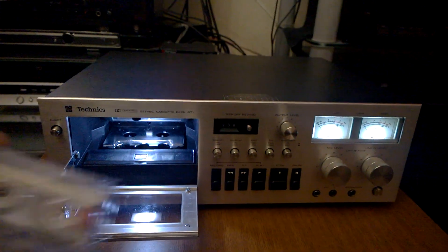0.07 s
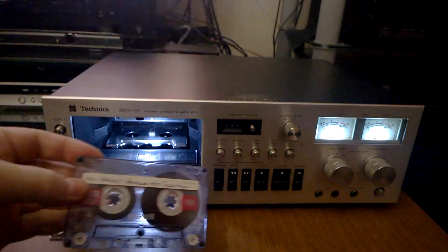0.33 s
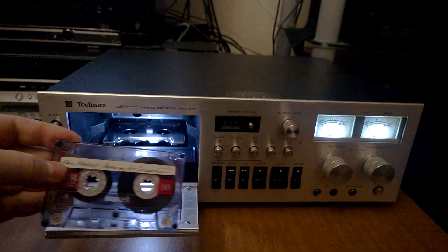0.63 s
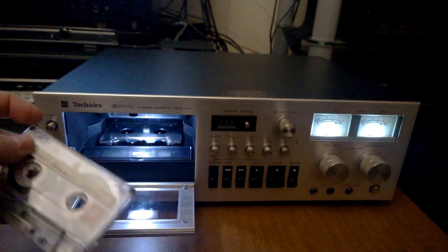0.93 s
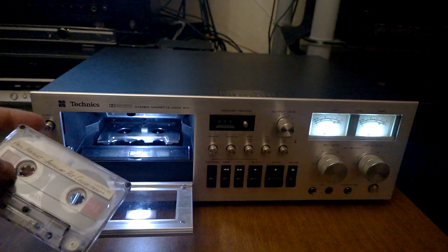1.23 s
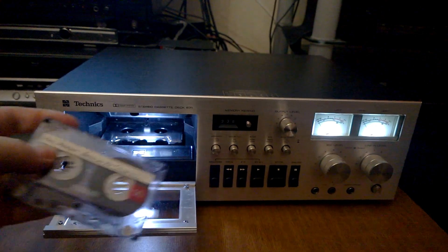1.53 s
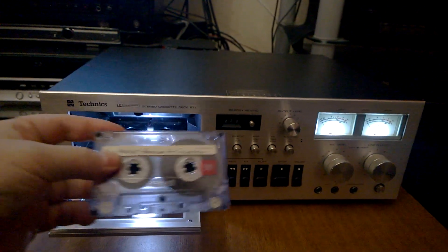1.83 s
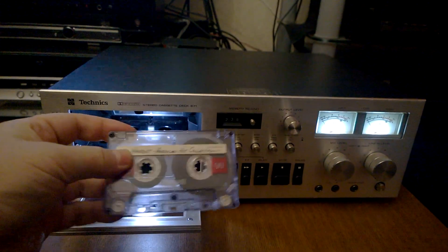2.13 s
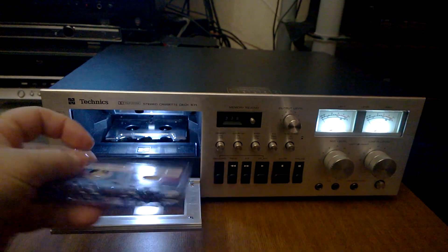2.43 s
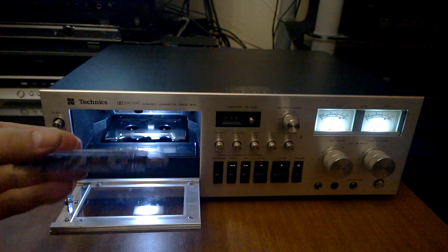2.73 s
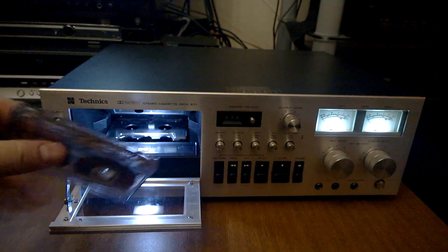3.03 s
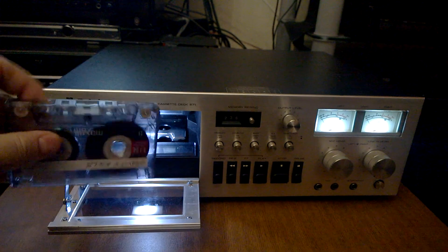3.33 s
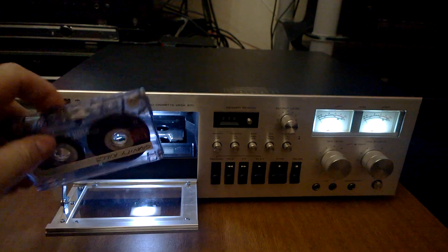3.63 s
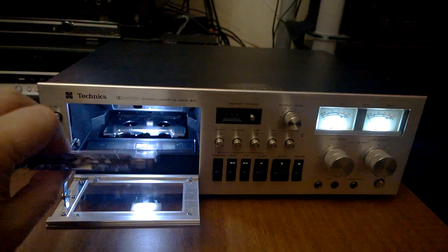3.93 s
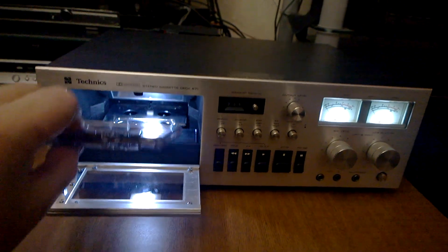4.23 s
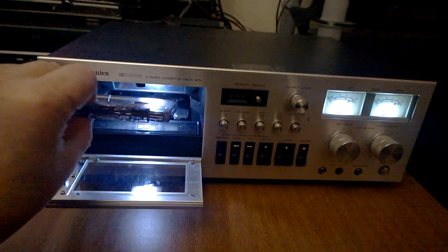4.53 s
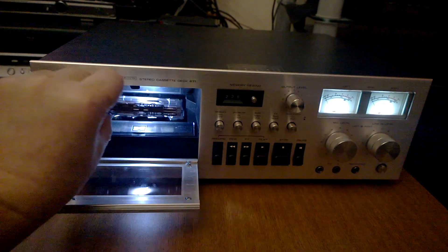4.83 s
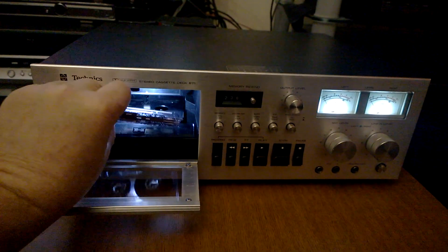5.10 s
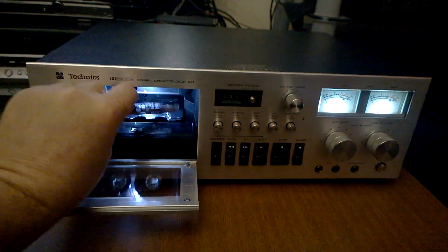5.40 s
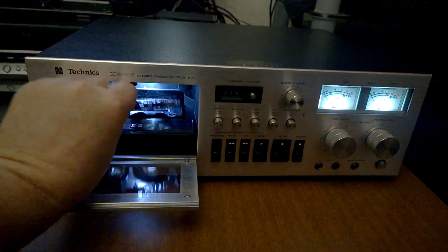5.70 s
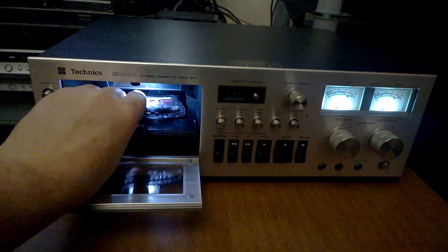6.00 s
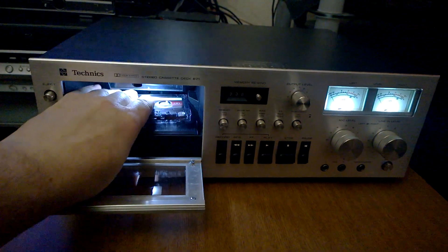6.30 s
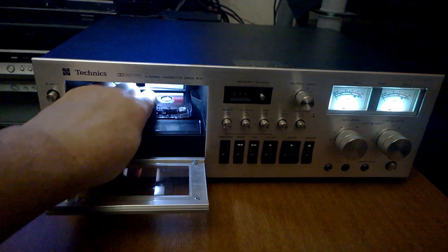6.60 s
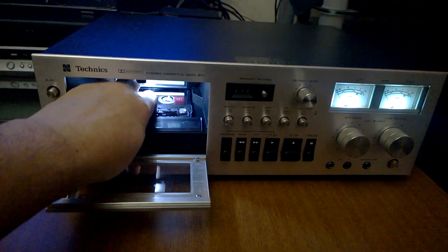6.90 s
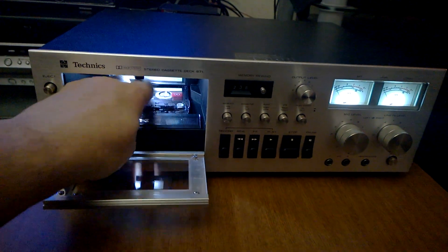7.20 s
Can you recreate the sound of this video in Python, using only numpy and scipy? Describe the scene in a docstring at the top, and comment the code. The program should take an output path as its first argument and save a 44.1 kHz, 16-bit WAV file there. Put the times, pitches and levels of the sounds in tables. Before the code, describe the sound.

A plastic cassette rattles lightly in the hand, then knocks and scrapes into a tape deck over faint hiss and hum.

```python
"""Loading a cassette into a tape deck

A plastic cassette is turned over in the hand, then pushed into a tape deck in a small, quiet room.
Its loose reels rattle and give thin squeaks. The shell scrapes along the guides, knocks on the
carriage (the holder it slides into), which rings, and plucks a spring as it snaps home.
Under it all lie a soft rumble, a faint mains hum and hiss."""
import sys
import numpy as np
from scipy import signal
from scipy.fft import rfft, irfft
from scipy.io import wavfile

SR = 44100
rng = np.random.default_rng(int(sys.argv[2]) if len(sys.argv) > 2 else 0)


def generate_wav(signal):
    """Clip the signal to [-1, 1] and save it as 16-bit WAV at the path in sys.argv[1]."""
    frames = np.transpose(np.atleast_2d(signal))
    scaled = np.clip(frames, -1, 1) * 32767
    pcm = np.round(scaled).astype(np.int16)
    wavfile.write(sys.argv[1], SR, pcm)


N = 324135
T = np.arange(N) / SR
AGE = T[:SR // 2]  # seconds since a blow; each blow gets half a second
# A "mode" is one tone an object rings at; "t60" is the time a sound takes to fade by 60 dB.
# Softness runs from 0 (bare plastic edge) to 1 (cushioned by a finger).

# the shell hitting the carriage: (time [s], level [dB], ring centre [Hz], softness [0-1],
# boom level [dB], second blow compared with the first [dB])
KNOCK_EVENTS = [(5.11, -52.5, 1000, .45, -73, -24), (5.126, -39.5, 900, 0.66, -66, -12.5),
                (5.304, -37.5, 1310, 0.34, -60, -11), (5.33, -44.5, 1080, 0.25, -47.5, -22),
                (5.608, -51.5, 1180, 0.76, -63.5, -6.5), (5.663, -42, 1030, 0.46, -66, -16),
                (5.726, -41, 864, .97, -74, -33), (5.755, -25.5, 780, 0.86, -52, -24),
                (5.82, -31.5, 1040, 0.9, -48, -9), (6.005, -53.5, 790, 0.76, -63.5, -3.5),
                (6.118, -31.5, 910, 0.23, -51.5, -4), (6.172, -25, 974, 0.07, -37, -18),
                (6.388, -47.5, 1040, 0.89, -72, -18.5), (6.456, -52.5, 890, 0.96, -74.5, -0.5),
                (6.542, -36, 1006, 0.6, -48.5, -5.5), (6.594, -49, 820, 0.65, -54.5, -25),
                (6.837, -59.5, 1145, .45, -69.5, -15), (6.979, -43, 1370, 0.67, -59, -5.5),
                (7.119, -47, 840, 0.16, -68, 1), (7.207, -47.5, 1120, 0.31, -60.5, -2),
                (7.252, -44.5, 940, .97, -59, -9), (7.338, -53.5, 965, 0.78, -57.5, -12)]
# the hand turning the cassette: (time [s], level [dB], half length [s])
HAND_TURNS = [(0.868, -64, .07), (2.368, -72.5, 0.16), (2.675, -60, 0.05), (2.996, -49, 0.036),
              (3.089, -45, 0.032), (3.181, -47.5, 0.022), (3.33, -56, 0.04)]
# tone colour of hard plastic contact: (frequency [Hz], level [dB])
CRACK_COLOUR = [(300, -3), (900, -12.5), (1800, -1), (2600, 5), (3500, 5), (5500, 3), (6800, 2.5),
                (8600, -10.5), (11000, -7.5), (13000, -9.5), (15500, -12)]


def knocks():
    """The shell hits the carriage, which rings; the deck's frame booms on for longer."""
    # carriage modes with the cassette on it: (frequency [Hz], level [dB], t60 [times the blow's])
    carriage_modes = [(390.5, -7, 1.6), (519, -4.5, 2.2), (614, -2, 1.3), (653, -10.5, 1.9), (702, 1, 1.25),
                      (786, 2, 1.5), (797.5, 0, 1), (871, -3.5, 1.97), (973, -4.5, 0.83),
                      (1043, -0.5, 1.17), (1106, 0, 1.1), (1214, -5, 0.98), (1291, -6.5, 1.2),
                      (1410, -5, 0.89), (1567, 9, 0.46), (1681, 7, 0.45), (1908, -13.5, 3.2),
                      (2137, -20, 0.53)]
    t60 = 0.056
    out = np.zeros((2, N))
    for s, ring_db, ring_hz, softness, boom_db in landings():
        crack_db, snap_db = contact_levels(ring_db, softness)
        body = ring(carriage_modes, t60, ring_hz, octaves=0.62, scatter_db=3, apart_hz=2800)
        body = keep_band(body, "high", 330, order=2)
        click = crack(crack_db, snap_db, t60, tail_db=-9.5, tail_t60=0.098, modes_db=-11)
        add(out, s, onset_level(body, ring_db) * pan(-1) + click * pan(0.53))
        add(out, s, onset_level(boom(), boom_db, span_s=0.0091) * pan(1.5))
        add(out, s - AGE[-1], lead_in(ring_db, crack_db, t60=0.05, body_db=-15.5, bright_db=-17.5))
    return out


def landings():
    """Each knock is two blows: one edge lands, then the shell settles and leans harder on the frame."""
    settle_s, lean_db = 0.016, 7
    for s, db, hz, softness, boom_db, settle_db in KNOCK_EVENTS:
        yield s, db, hz, softness, boom_db
        yield s + settle_s, db + settle_db, hz, softness, boom_db + settle_db + lean_db


def boom():
    """The deck's frame: a few low panel tones over a dull thud."""
    # modes of the frame: (frequency [Hz], level [dB], t60 [s])
    frame_modes = [(76.5, -12.5, .12), (145.8, -11.5, 0.09), (160, -18.5, 0.12), (252, -5.5, 0.13),
                   (295.5, -7, 0.4), (330, -13, 0.12), (377, -16, 0.11)]
    # tone colour of the thud: (frequency [Hz], level [dB])
    thud_colour = [(40, -9), (75, 4), (110, -13), (150, -16), (200, -13.5), (290, 10.5), (380, -6),
                   (490, -6.5), (650, -17), (1000, -43), (3000, -62.5)]
    panels = ring(frame_modes, 1, 310, octaves=1.4, scatter_db=5.5, apart_hz=6000)
    thud = shape(stereo_noise(len(AGE), 2500), spectrum(thud_colour, len(AGE))) * fade(0.18)
    both = onset_level(panels, 0, span_s=0.04) + onset_level(thud, -2.6, span_s=0.012)
    return both * (1 - fade(0.0083))


def rattles():
    """Loose reels and fingers click against the hand-held shell; softer blows ring lower."""
    # blows on the shell: (time [s], level [dB], softness [0-1])
    blows = [(0.827, -52.5, 0.74), (0.857, -43.5, 0.8), (0.942, -49, 1), (1.006, -59, .85), (2.242, -52, 1),
             (2.284, -58.5, 0.17), (2.298, -41.5, 0.75), (2.445, -55.5, 0.1), (2.459, -46, 0.02),
             (2.523, -52.5, 0.64), (2.706, -50.5, 0.97), (2.997, -45.5, 0.32), (3.059, -46.5, 0.15),
             (3.098, -38.5, 0.05), (3.114, -28, 0.61), (3.126, -38, 0.05), (3.151, -38.5, 0.18),
             (3.169, -37.5, 0.68), (3.223, -46, 0.72), (3.232, -46, 0.66), (3.264, -49, 0.42),
             (3.344, -47, 0.36), (3.349, -44.5, 0.7), (3.362, -38.5, 0.63), (3.4, -59, 0.3),
             (3.423, -55, .9), (3.621, -56, 0.31), (3.633, -49, 0.85), (3.697, -46.5, 0.78),
             (3.719, -47.5, 1), (3.976, -53.5, .85)]
    # modes of the shell: (frequency [Hz], level [dB], t60 [times the blow's])
    shell_modes = [(534, -3, 0.65), (694, -4.5, 1.4), (843, -15, 1.3), (967, 10, 0.37), (1050, -14.5, 2.33),
                   (1128, -4, 1.1), (1296, 0, 0.68), (1367, -1, 0.48), (1674, 2, 0.41), (1850, -3.5, 0.56),
                   (2190, 10, 0.45), (2580, 10, 0.49)]
    t60, bare_hz, cushion_octaves = 0.044, 1563, 0.57
    out = np.zeros((2, N))
    for s, ring_db, softness in blows + stray_ticks(per_turn=2):
        ring_hz = bare_hz * 2 ** (-cushion_octaves * softness)
        crack_db, snap_db = contact_levels(ring_db, softness)
        body = ring(shell_modes, t60, ring_hz, octaves=0.57, scatter_db=3, apart_hz=2200)
        body = keep_band(body, "high", 400)  # the shell is too small to give off bass
        click = crack(crack_db, snap_db, t60, tail_db=-7, tail_t60=0.058, modes_db=-17)
        add(out, s, onset_level(body, ring_db) * pan(-1.6) + click * pan(4.4))
        add(out, s - AGE[-1], lead_in(ring_db, crack_db, t60=0.032, body_db=-9, bright_db=-8))
    return out


def stray_ticks(per_turn):
    """Each turn shakes small ticks out of the reels: (time [s], level [dB], softness [0-1])."""
    offset_db, spread_db, softness = -0.5, 3, 0.51
    return [(s + half_length * when, db + offset_db + spread_db * strength, softness)
            for s, db, half_length in HAND_TURNS
            for when, strength in rng.uniform(-1, 1, (per_turn, 2))]


def contact_levels(ring_db, softness):
    """Cushioning takes away a blow's snap (above 8 kHz) first, then its crack (below 8 kHz)."""
    crack_db = ring_db + 1.5 - 18 * softness ** 2
    snap_db = ring_db + 6.5 - 42 * softness
    return crack_db, snap_db


def crack(crack_db, snap_db, t60, tail_db, tail_t60, modes_db):
    """Hard contact: a burst of chatter leaves the plastic ringing; the highest part dies first."""
    # high modes of hard plastic: (frequency [Hz], level [dB], t60 [times the blow's])
    plastic_modes = [(2570, -8, 0.69), (2935, 7.5, 2.1), (3366, 5, 0.97), (3820, -7.5, 1.1),
                     (4990, 10, 0.69), (4850, 5.5, 0.76), (5840, -11.5, 1), (6380, -23.5, 2.8),
                     (6670, -4.5, 1.1), (7500, -0.5, 0.85), (7650, -10.5, 1.3), (7900, -7, 1.3),
                     (8600, -5.5, 1.9), (10630, -12.5, 3.1), (11350, -3, 0.75), (12000, -4.5, 0.89),
                     (14100, -9, 0.73), (14700, -21.5, .7)]
    chatter = shape(stereo_noise(len(AGE), 1060), spectrum(CRACK_COLOUR, len(AGE)))
    chatter *= fade(t60 * 0.42) + undb(tail_db) * fade(tail_t60)
    ringing = ring(plastic_modes, t60, 6000, octaves=2.9, scatter_db=3.5, apart_hz=2480)
    sound = onset_level(chatter, 0) + onset_level(ringing, modes_db)
    low = keep_band(sound, "low", 8000)
    high = keep_band(sound, "high", 8000) * fade(0.45)
    return onset_level(low, crack_db) + onset_level(high, snap_db) * pan(1.9)


def lead_in(ring_db, crack_db, t60, body_db, bright_db):
    """A short swell of noise that rises into each blow and softens its attack."""
    size = len(AGE)
    body = shape(stereo_noise(size, 2000), peak(1020, 520, size))
    bright = shape(stereo_noise(size, 1300), spectrum(CRACK_COLOUR, size))
    return (undb(ring_db + body_db) * body + undb(crack_db + bright_db) * bright) * fade(t60)[::-1]


def ring(modes, t60_scale, centre_hz, octaves, scatter_db, apart_hz):
    """A struck object rings: modes near centre_hz are favoured, and each blow lands on a new spot."""
    out = np.zeros((2, len(AGE)))
    for (hz, db, t60), luck in zip(modes, rng.standard_normal((len(modes), 5))):
        gain = undb(db + scatter_db * luck[0]) / (1 + (np.log2(hz / centre_hz) / octaves) ** 2)
        # modes start roughly together; high ones reach left and right out of step
        phase = 1.09 * luck[1] + hz / apart_hz * luck[2:4, None]
        hz = hz * (1 + .007 * luck[4])  # the changing grip shifts the pitch a little
        out += gain * fade(t60 * t60_scale) * np.sin(2 * np.pi * hz * AGE + phase)
    return out * (1 - fade(0.0063))


def squeaks():
    """The reel hubs stick and slip as they turn, singing one high, wavering note."""
    # hub squeaks: (time [s], level [dB], half length [s])
    hub_slips = [(0.853, -56, 0.011), (0.92, -62.5, 0.0052), (2.302, -57, .01), (2.377, -65.5, 0.018),
                 (2.459, -44, 0.0083), (2.647, -46.5, .015), (2.775, -59.5, 0.021), (2.994, -44.5, .009),
                 (3.07, -46, 0.0072), (3.283, -61, 0.023), (5.767, -47, 0.0076), (5.839, -50, 0.0031),
                 (6.597, -60, 0.013), (7.083, -60.5, 0.0054)]
    pitch_hz, waver_hz = 6360, 42
    phase = 2 * np.pi * np.cumsum(pitch_hz + waver_hz * wobble(150)) / SR
    note = np.sqrt(2) * np.sin(phase) + 0.56 * narrow_noise(6460, 650)
    return swells(hub_slips) * note * pan(6.1)


def pings():
    """The shell plucks the steel spring that holds it, and the spring rings thinly."""
    # plucks: (time [s], level [dB])
    plucks = [(7.119, -52), (7.137, -55)]
    # modes of the spring: (frequency [Hz], level [dB], t60 [s])
    spring_modes = [(2290, -8.5, 0.19), (3610, -16, 0.15), (5700, -7, 0.047), (9400, -7, 0.073),
                    (12150, -5, 0.066)]
    out = np.zeros((2, N))
    for s, db in plucks:
        spring = ring(spring_modes, 1, 5000, octaves=4, scatter_db=2, apart_hz=3000)
        add(out, s, onset_level(spring, db))
    return out


def sliding():
    """The shell scrapes along the guides when pushed, and skids on briefly after each knock."""
    # pushes: (time [s], level [dB], half length [s])
    pushes = [(4.86, -68.5, 0.15), (5.7, -51, 0.015), (5.91, -47, 0.02), (6.027, -47, 0.022),
              (6.44, -59.5, 0.16), (6.895, -60, 0.038), (7.06, -59.5, 0.017)]
    # tone colour of the scrape: (frequency [Hz], level [dB])
    colour = [(100, -4.5), (220, -5), (290, 8.5), (380, -2.5), (500, 2), (800, 1.5), (1150, 3),
              (1900, -20.5), (4000, -21), (7000, -33.5), (15000, -42.5)]
    skids = np.zeros((1, N))
    for s, db, *_ in KNOCK_EVENTS:
        add(skids, s, undb(db - 17) * fade(t60=0.34)[None])
    return friction(swells(pushes) + skids[0], colour, rough_db=4, slip_hz=110.4, alike_hz=2800)


def rubbing():
    """Fingers and reels rub on the shell as it is turned."""
    # tone colour of the rubbing: (frequency [Hz], level [dB])
    colour = [(150, -43), (300, -7), (520, -8.5), (750, 1.5), (1300, 1), (2400, 2), (3500, -14),
              (6500, -2.5), (9000, -14), (15000, -16)]
    return friction(swells(HAND_TURNS), colour, rough_db=5, slip_hz=250, alike_hz=1500) * pan(5.8)


def rumble():
    """A hand-held microphone rumbles as it is moved."""
    # hand movements: (time [s], level [dB], half length [s])
    sways = [(0.82, -62.5, 0.096), (1.35, -66, .18), (7.22, -60.5, 0.18)]
    # tone colour of the rumble: (frequency [Hz], level [dB])
    colour = [(15, -1), (30, 3), (55, -9), (110, -19), (250, -29.5), (1000, -58), (15000, -90)]
    return friction(swells(sways), colour, rough_db=4.5, slip_hz=10, alike_hz=60.5)


def friction(level, colour, rough_db, slip_hz, alike_hz):
    """Surfaces catch and slip, making noise in uneven spurts."""
    spurts = undb(rough_db * wobble(slip_hz))
    return level * shape(stereo_noise(N, alike_hz) * spurts, spectrum(colour, N))


def room(x, t60, echo_db, dull_hz):
    """A small furnished room adds a short, dull wash of echoes."""
    size = len(AGE)
    tail = shape(stereo_noise(size, 785), 1 / np.hypot(1, freqs(size) / dull_hz))
    tail *= fade(t60) * (1 - fade(0.013))
    tail /= np.sqrt(np.sum(tail ** 2) / 2)
    return x + undb(echo_db) * signal.fftconvolve(x, tail, axes=1)[:, :N]


def background():
    """Steady hiss with a deep rumble in it, a few faint whines and the mains hum."""
    # tone colour of the hiss: (frequency [Hz], level [dB])
    hiss_colour = [(20, 14.5), (40, 11), (70, 7), (110, -0.5), (160, 0), (300, -2), (600, -8), (850, -7),
                   (1100, -7), (1400, -5.5), (2200, -5.5), (3000, -15), (5200, -13.5), (8500, -23.5),
                   (10000, -23.5), (10600, -16), (11500, -25.5), (13500, -25.5), (15500, -24.5)]
    # which side the hiss leans to: (frequency [Hz], left minus right [dB])
    hiss_balance = [(60, 0), (110, -5), (200, 3), (380, -1.5), (700, 1), (1290, -11.5), (2380, -1.5),
                    (4400, 0.5), (8120, 2), (15000, 7)]
    # faint whines: (frequency [Hz], width [Hz], left level [dB], right level [dB])
    whine_bands = [(1119, 160, -88, -69.5), (2031, 54, -85, -72.5), (2450, 55, -87, -87.5)]
    hum_hz, hum_db, hiss_db = 100.4, -77.5, -63.5
    lean = np.sqrt(spectrum(hiss_balance, N))
    hiss = shape(stereo_noise(N, 63), spectrum(hiss_colour, N) * np.array([lean, 1 / lean]))
    whines = sum(undb([[left], [right]]) * narrow_noise(hz, width)
                 for hz, width, left, right in whine_bands)
    hum = np.sqrt(2) * np.sin(2 * np.pi * hum_hz * T)
    return undb(hiss_db) * hiss + whines + undb(hum_db) * hum


def undb(db):
    """Turn decibels into a gain to multiply by."""
    return 10 ** (np.asarray(db) / 20)


def onset_level(x, db, span_s=0.0027):
    """Scale a blow so that its first moments have the given average (rms) level."""
    weight = np.exp(-(AGE / span_s) ** 2)
    return x * undb(db) / np.sqrt(np.mean(x ** 2 @ weight) / weight.sum())


def fade(t60):
    """A decay that loses 60 dB in t60 seconds."""
    return np.exp(-np.log(1000) * AGE / max(t60, 1e-3))


def swells(rows):
    """The loudness of smooth movements: each rises to its peak and falls the same way."""
    return sum(undb(db) * np.exp(1 - np.hypot(1, 2 * (T - s) / half_length))
               for s, db, half_length in rows)


def freqs(size):
    """The frequencies in a sound this many samples long."""
    return np.maximum(np.fft.rfftfreq(size, 1 / SR), 1)


def spectrum(points, size):
    """A curve of gains that joins (frequency [Hz], level [dB]) points."""
    hz, db = np.transpose(points)
    return undb(np.interp(np.log(freqs(size)), np.log(hz), db))


def peak(hz, width_hz, size):
    """A curve of gains with one hump around hz."""
    return 1 / (1 + ((freqs(size) - hz) / width_hz * 2) ** 2)


def shape(x, gain):
    """Colour a sound with a curve of gains, then set its average (rms) level to 1."""
    coloured = irfft(rfft(x) * gain, x.shape[-1])
    return coloured / np.sqrt(np.mean(coloured ** 2))


def keep_band(x, side, hz, order=4):
    """Keep the part of a sound on the "low" or "high" side of hz."""
    return signal.sosfilt(signal.butter(order, hz, side, fs=SR, output="sos"), x)


def narrow_noise(hz, width_hz):
    """Noise gathered around one pitch."""
    return shape(rng.standard_normal(N), peak(hz, width_hz, N))


def wobble(hz):
    """A random wander, mostly slower than hz."""
    return narrow_noise(0, 2 * hz)


def stereo_noise(size, alike_hz):
    """Left and right noise, alike below alike_hz and unrelated above."""
    mid, side = rng.standard_normal((2, size))
    side = irfft(rfft(side) / np.hypot(1, alike_hz / freqs(size)), size)
    return np.array([mid + side, mid - side])


def pan(db):
    """Gains that make the left side db louder than the right."""
    return undb(np.array([[db], [-db]]) / 2)


def from_left(x, lag_s):
    """A sound from the left reaches the right side a moment later."""
    return np.array([x[0], np.interp(T - lag_s, T, x[1])])


def add(out, s, x):
    """Mix x into out, starting at s seconds."""
    i = int(s * SR)
    out[:, i:i + x.shape[1]] += x[:, :max(N - i, 0)]


def scene():
    """The cassette in the hand, then in the deck, in a quiet room."""
    hand = rattles() + squeaks() + rubbing()
    deck = knocks() + pings() + sliding()
    direct = from_left(hand, 9 / SR) + from_left(deck, 5 / SR)
    return rumble() + room(direct, t60=0.14, echo_db=-13, dull_hz=5000) + background()


def record(dry):
    """Cut away the very highest treble."""
    top_hz = 16000
    return signal.sosfilt(signal.ellip(10, .2, 80, top_hz, fs=SR, output="sos"), dry)


dry = scene()
out = record(dry)
generate_wav(out)
```